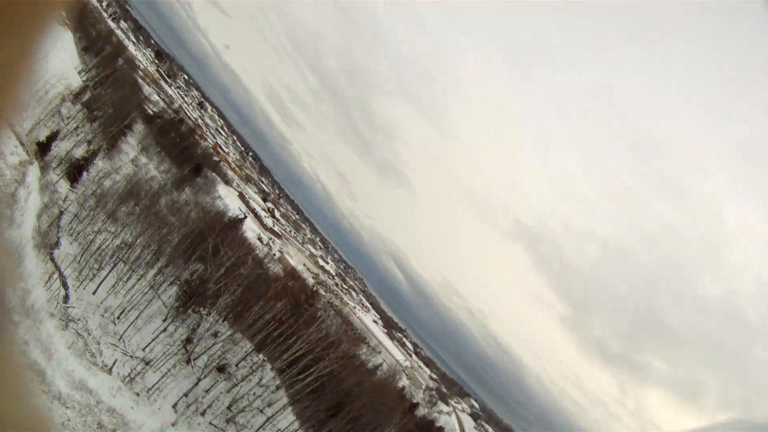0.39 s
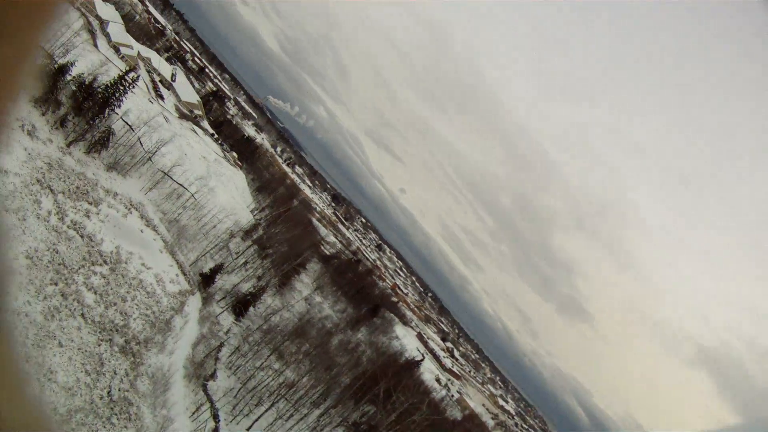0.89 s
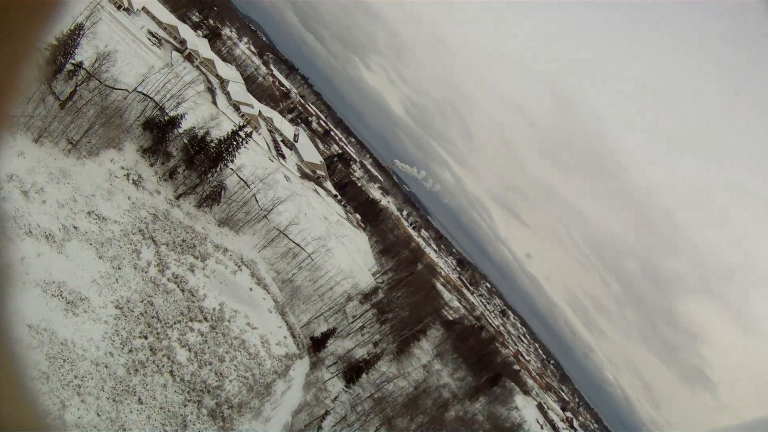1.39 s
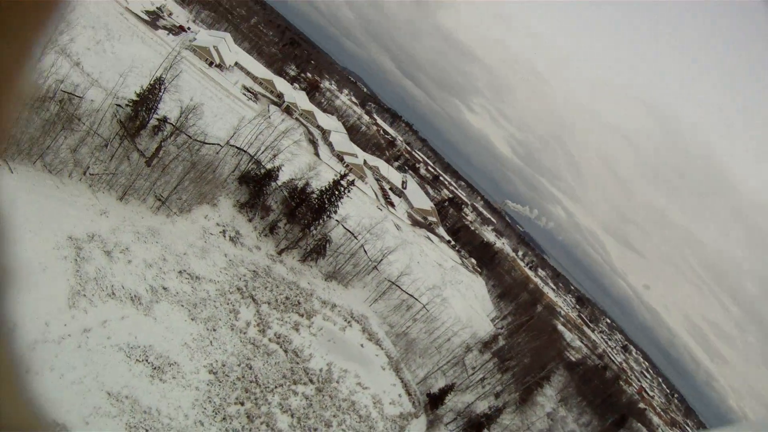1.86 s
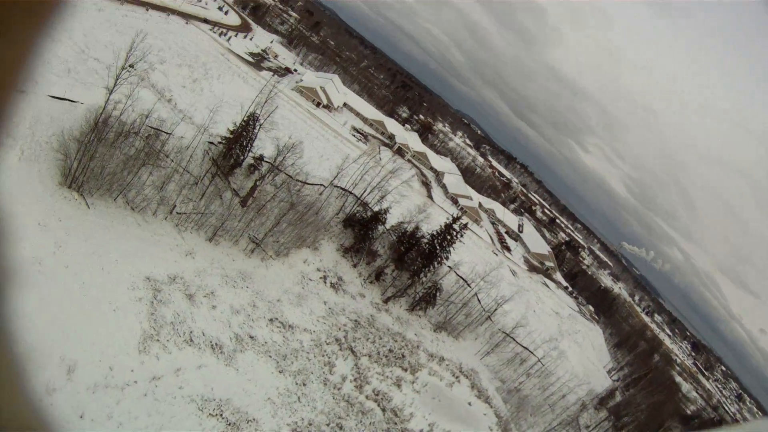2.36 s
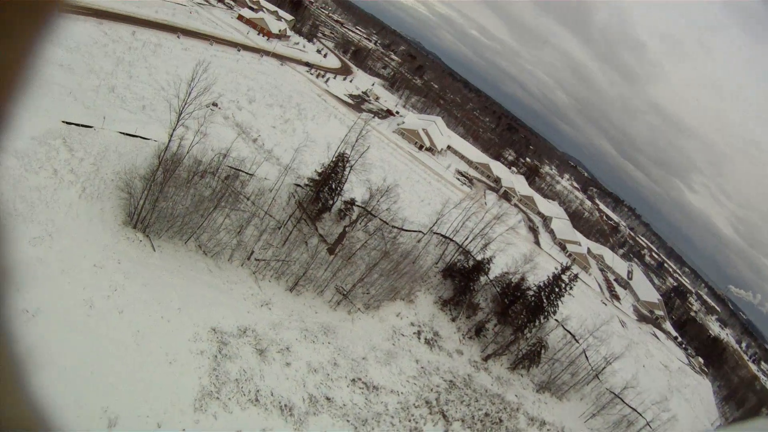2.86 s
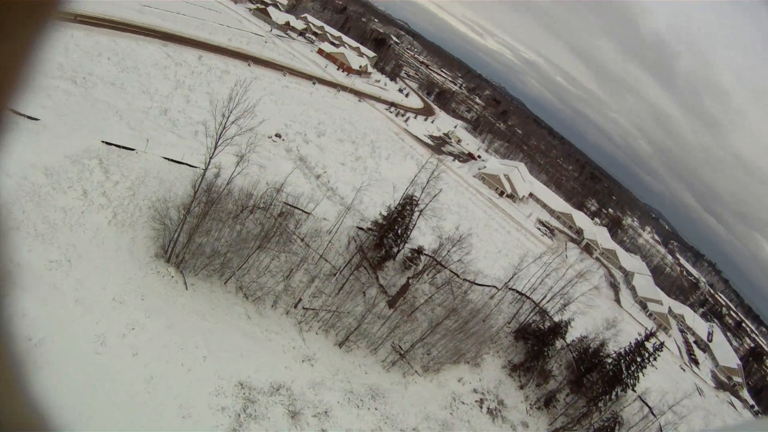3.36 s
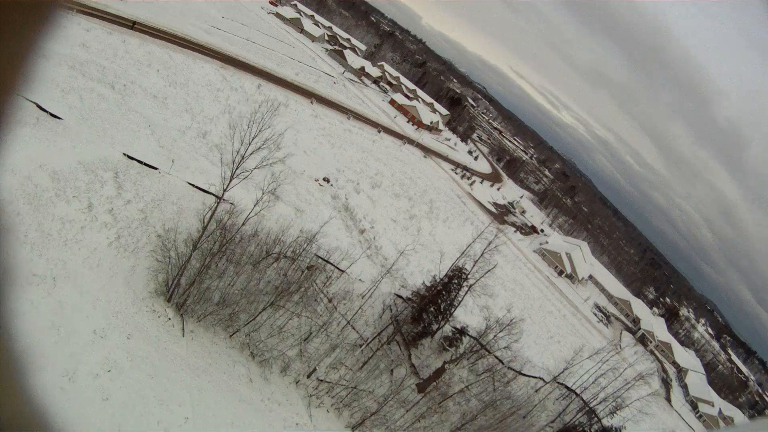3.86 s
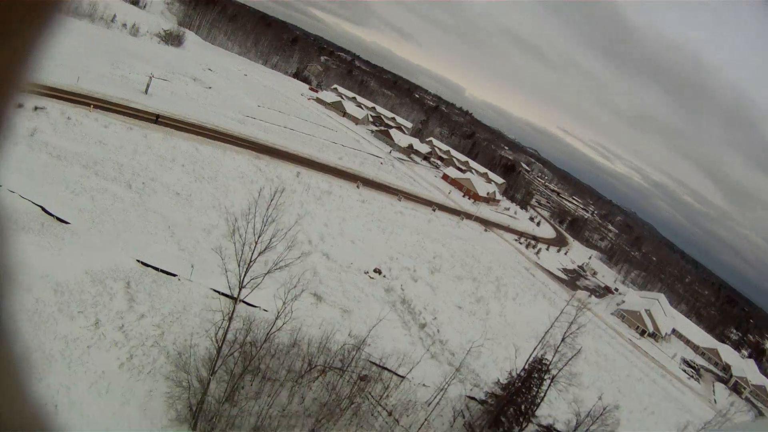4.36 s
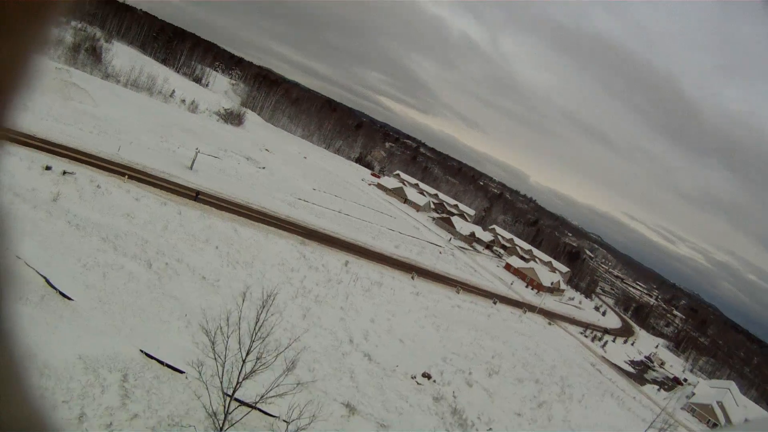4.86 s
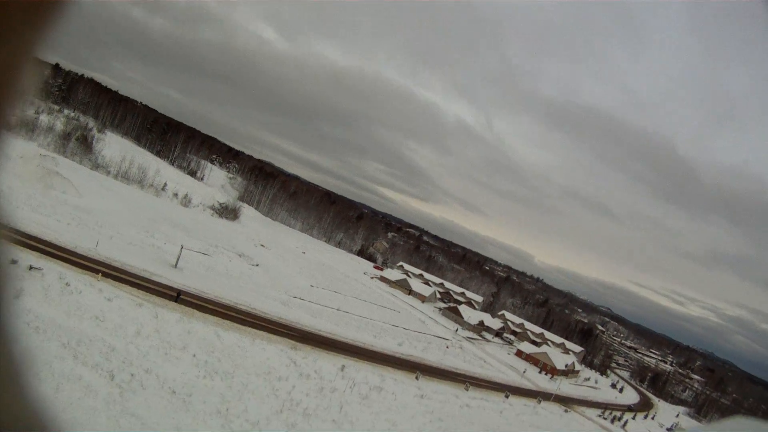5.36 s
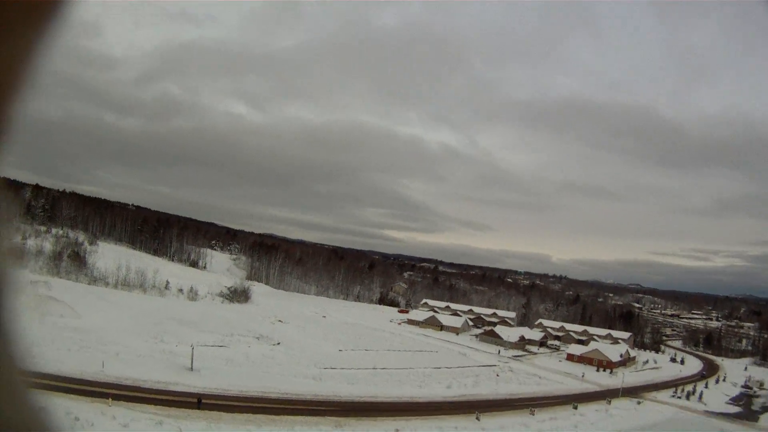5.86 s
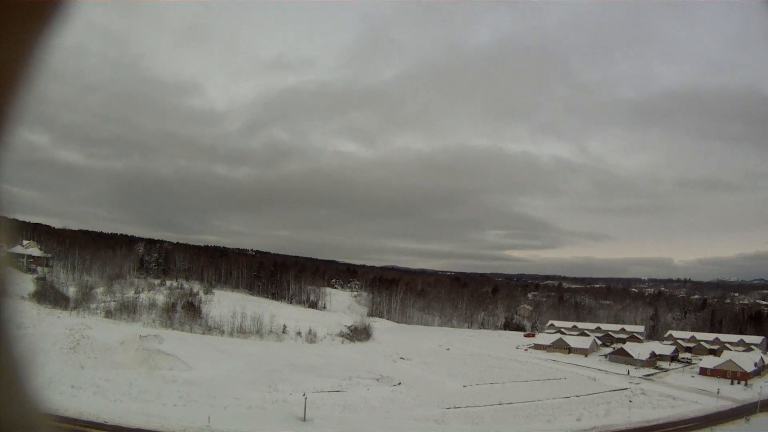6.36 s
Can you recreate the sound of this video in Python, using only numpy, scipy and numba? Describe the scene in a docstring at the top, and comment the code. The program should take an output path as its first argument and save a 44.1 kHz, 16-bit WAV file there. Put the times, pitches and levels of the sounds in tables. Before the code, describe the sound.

A cheap small microphone fixed to a flying airframe picks up twin propeller whine, dense and buzzy with a metallic, grainy treble. The two motors pulse against each other, slowly at first, faster from about three seconds. Pitch climbs a little, then eases down. Wind rumbles and thumps, strongest around five seconds, briefly ducking the sound. Dry servo ticks come at the start and the end.

```python
"""Two propellers of a twin-motor model plane whine at nearly the same speed and beat, through a banked turn.
A small camera rides on the airframe: airflow buffets and thumps its microphone, blade turbulence hisses,
and a servo twitches in its linkage. Tones are sums of sines, air is filtered noise, and the servo is
snaps and scrapes through resonances. Gain control ducks on loud peaks, and the camera's coarse sampling
holds each value, which mirrors every tone into the treble."""
import sys
import numpy as np
from scipy import signal
from scipy.fft import rfft, irfft
from scipy.io import wavfile
from scipy.ndimage import uniform_filter1d
from numba import njit

SR = 44100
rng = np.random.default_rng(int(sys.argv[2]) if len(sys.argv) > 2 else 0)


def unload_audio(sound):
    """Save the sound as a 16-bit wav file, at the path given as the first command line argument."""
    columns = np.transpose(np.atleast_2d(sound))
    # keep every value between -1 and 1, then stretch to whole-number steps
    steps = np.round(np.clip(columns, -1, 1) * 32767)
    wavfile.write(sys.argv[1], SR, steps.astype(np.int16))


def voltage_ratio(decibels):
    """Convert decibels (scalar or array-like) to amplitude ratios, 20 dB per decade."""
    exponent = np.asarray(decibels, float) / 20
    return 10 ** exponent


N = 286648
TIME = np.arange(N) / SR  # seconds
AIRFRAME_LAG = 0.25  # radians per order squared


def unit(x):
    """Scale to rms 1."""
    return x / np.sqrt(np.mean(x ** 2))


def colour(x, points):
    """Filter by a (Hz, dB) outline, interpolated over log frequency."""
    hz, db = np.transpose(points)
    f = np.maximum(np.fft.rfftfreq(len(x), 1 / SR), 1)
    gain = voltage_ratio(np.interp(np.log(f), np.log(hz), db, -90, -90))
    return irfft(rfft(x) * gain, len(x))


def walk(rate):
    """Random levels held 1 / rate seconds and slewed twice; spread near 1."""
    hold = int(SR / rate)
    steps = np.repeat(rng.standard_normal(N // hold + 1), hold)
    return 1.3 * uniform_filter1d(uniform_filter1d(steps, hold), hold)[:N]


def curves(table):
    """Columns of a table, after its seconds, as signals."""
    s, *columns = np.transpose(table)
    return [np.interp(TIME, s, c) for c in columns]


def tone(angle, db, flutter_db, throb=0., swell=1.):
    """A sine of given rms level that turbulent inflow makes flutter; some also throb evenly or swell."""
    beat = 2 * np.pi * 16.7 * TIME  # throb rate in Hz
    sway = 1 + throb * (np.cos(beat) + np.cos(2 * beat)) if throb else 1
    level = np.sqrt(2) * voltage_ratio(db + flutter_db * walk(60))
    return level * sway * np.abs(swell) * np.cos(angle + np.angle(swell))


# Near motor, low overtones. Each row: order of the blade rate, level in dB at 192 blade passes/s and
# zero loudness offset, slope in dB per blade pass/s above 192.
LOW_OVERTONES = [(2, -18, -0.28), (3, -17.5, 0.04), (4, -27.5, 0.29), (5, -24.5, .3), (6, -29, -0.42),
                 (7, -34, -.5), (8, -31, -0.36)]
# Higher overtones as the airframe passes them on. Each row: frequency in Hz, level in dB at zero
# loudness offset.
AIRFRAME = [(1700, -37.5), (1900, -34.5), (2100, -37.5), (2400, -42), (2700, -50), (3100, -52.5),
            (3400, -48), (3580, -38.5), (3800, -52), (4000, -43), (4200, -50), (4700, -67), (5150, -45),
            (5600, -50)]


def overtone_levels(speed, loudness_db):
    """Levels of orders 2 to 30: the low ones follow speed, the rest slide along the airframe's response."""
    reference_speed = 192  # blade passes per second
    low_per_loudness = 0.95  # dB per dB
    levels = [db + slope * (speed - reference_speed) + low_per_loudness * loudness_db
              for _, db, slope in LOW_OVERTONES]
    hz, db = np.transpose(AIRFRAME)
    for k in range(9, 31):
        levels.append(np.interp(k * speed, hz, db) + loudness_db + 2 * walk(3))
    return levels


# Both motors shake one frame, so overtones swell as the far blade gains on the near one.
# Each row: order, swells per turn gained (rounded when played), level in dB re the overtone,
# degrees ahead at the start.
SHARED_SHAKE = [(2, 1, -13, 39), (2, 2, -9.5, -5), (3, 2, -23, 44), (3, 2.5, -26.5, 63), (4, 1, -15, 90),
                (4, 1.5, -20, -65), (5, -1, -15.5, -162), (5, 1.5, -6, 14), (5, 2, -23.5, 59),
                (6, 1, 3, -165), (6, 2, -4, -110), (6, 3, -10, -49), (7, 1, 7, 59), (7, 2, -6.5, 184),
                (7, 3.5, -5, -125), (8, 0.5, -13.5, -135), (8, 2.5, -14.5, -50), (8, 2.5, -21, 1),
                (9, 1, -6, 62), (9, 2.5, -9, 180), (9, 3.5, -19, -10), (10, 1, -4.5, 51),
                (10, 1.5, -15, -21)]


def frame_swell(order, gained):
    """Complex gain of an overtone from the shared frame; higher overtones crest earlier."""
    lead_s = 0.013 * (order - 2)
    ahead = gained + np.gradient(gained) * SR * lead_s
    swell = 1
    for k, turns, db, degrees in SHARED_SHAKE:
        if k == order:
            swell = swell + voltage_ratio(db) * np.exp(1j * (round(turns) * ahead + np.radians(degrees)))
    return swell


def near_overtones(speed, angle, gained, loudness_db):
    """Overtones of the blade rate; the airframe delays lower ones, so each pass is a smeared pulse."""
    shaken = angle + 0.015 * walk(25)  # jitter in radians
    pulse_skew = 2.0  # radians, how lopsided the pressure pulse of a blade pass is
    total = np.zeros(N)
    for k, db in enumerate(overtone_levels(speed, loudness_db), start=2):
        phase = k * shaken + AIRFRAME_LAG * k * k + pulse_skew
        pole_throb = 0.3 if k == 7 else 0
        total += tone(phase, db, min(0.28 * k, 2.5), pole_throb, frame_swell(k, gained))
    return total


# Unequal blades sound once a shaft turn, between the overtones.
# Each row: order of the blade rate, level in dB before drift.
UNEQUAL_BLADES = [(2.5, -47), (3.5, -50.5), (4.5, -63), (6.5, -47.5), (7.5, -52)]


def unequal_blades(angle):
    """Half orders of the near propeller, whose blades differ; their levels drift."""
    return sum(tone(k * angle, db + 4 * walk(3.05), 2.2) for k, db in UNEQUAL_BLADES)


# Far motor; the high orders come from the magnets.
# Each row: order of the blade rate, level in dB before flutter.
FAR_ORDERS = [(1, -31), (7, -37.5), (13, -38.5), (14, -45), (28, -50)]


def far_motor(angle):
    """A few orders, and the speed controller's switching tone lowered by a magnet order."""
    orders = sum(tone(k * angle - AIRFRAME_LAG * k * k, db, 2.9) for k, db in FAR_ORDERS)
    switching = 2 * np.pi * 8016 * TIME - 14 * angle  # 8016 Hz less order 14
    return orders + tone(switching, -32, 0.8, throb=0.18)


# Outline of the blade hiss before rms scaling. Each row: frequency in Hz, relative density in dB per Hz.
RUSH = [(150, -18), (300, -19.5), (480, -4), (680, -6), (860, -3.5), (1300, -2.5), (1900, -5), (2500, -8.5),
        (3000, -15.5), (3600, -13.5), (4500, -13.5), (5200, -12), (5700, -17), (5950, -21.5)]


def rush(angle, db):
    """Blade turbulence: hiss that swells at each blade pass, with scattered ticks."""
    ticks = voltage_ratio(1.5 * rng.exponential(size=N)) * rng.standard_normal(N)
    gate = 1 + 0.28 * np.cos(angle) + 0.24 * np.cos(3 * angle)
    unsteady = voltage_ratio(0.68 * walk(30) + 0.43 * walk(6.5))
    return unit(colour(gate * ticks * unsteady, RUSH)) * voltage_ratio(db)


# Outline of the wind on the microphone before rms scaling and limiting.
# Each row: frequency in Hz, relative density in dB per Hz.
BUFFET = [(12, -36), (20, -6), (43, -2.5), (86, -2), (167, -7.5), (195, -8.5), (222, -12.5), (340, -17),
          (440, -20), (750, -120)]


def buffet(db):
    """Eddies shed over the microphone port: low noise in uneven bursts of limited swing."""
    bursts = rng.standard_normal(N) * voltage_ratio(2.7 * walk(25))
    eddies = unit(colour(bursts, BUFFET))
    return 3.84 * np.tanh(eddies / 2.0) * voltage_ratio(db)


# Servo knocks at set times, strong and weak. Each row: start in seconds, strength in dB before the
# linkage rings.
KNOCKS = [(0.0133, -13.5), (0.0378, -20), (0.076, -7.5), (0.2124, -23), (0.2754, -17), (0.3905, -16.5),
          (0.429, -13), (0.508, -22), (0.7834, -23), (0.824, -16), (0.9227, -15), (1.1573, -18),
          (5.4294, -10), (5.5283, -14.5), (5.5424, -15), (5.566, -16), (5.585, -18), (5.665, -21),
          (5.6827, -19), (5.8052, -19.5), (5.842, -20), (6.0378, -18), (6.1204, -10), (6.1327, -14),
          (6.1428, -5), (6.147, -3), (6.1574, -12), (6.167, -9), (6.1764, -15.5)]
# The servo hunts. Each row: start in seconds, end in seconds, typical twitch strength in dB
# before the linkage rings.
HUNTS = [(0.03, 0.52, -24), (0.77, 1.11, -24.5), (5.36, 5.86, -22.5), (6.04, 6.23, -24)]


def twitches():
    """Set knocks, and chance twitches on the command pulses while the servo hunts."""
    pulses = np.arange(0.0156, N / SR, 0.019687)  # first pulse and spacing in seconds
    luck, size = rng.random(len(pulses)), rng.standard_normal(len(pulses))
    share, spread_db, hardest_db = 0.65, 3, -15  # of the chance twitches
    events = list(KNOCKS)
    for start, end, db in HUNTS:
        for s, u, z in zip(pulses, luck, size):
            if start < s < end and u < share:
                events.append((s, min(db + spread_db * z, hardest_db)))
    return events


# Resonances of the linkage. Each row: frequency in Hz, width in Hz, relative level in dB.
LINKAGE = [(2360, 2160, -3), (4080, 620, -1), (4537, 190, -1)]


def rattle():
    """Each twitch snaps and scrapes, longer when harder, with stray gear ticks near; all ring the linkage."""
    scrape, snap = np.zeros(N), np.zeros(N)
    age = np.arange(SR // 20) / SR
    for s, db in twitches():
        i = int(s * SR)
        fall_s = max(0.038 + 0.0011 * db, 0.003)  # time to fall 60 dB
        scrape[i:i + len(age)] += voltage_ratio(db - 60 * age / fall_s)
        snap[int((s + 0.0005) * SR)] = 3 * voltage_ratio(db)
    busy = uniform_filter1d(np.minimum(scrape, 0.05), SR // 12)
    strikes = rng.random(N) < 180 / SR  # 180 chances a second
    ticks = 45 * busy * strikes * rng.standard_normal(N)
    dry_rattle = snap + ticks + scrape * rng.standard_normal(N)
    rung = np.zeros(N)
    for hz, width, db in LINKAGE:
        rung += voltage_ratio(db) * signal.lfilter(*signal.iirpeak(hz, hz / width, SR), dry_rattle)
    return 2.25 * rung


# Gust thumps on the microphone. Each row: time of the push in seconds, relative level in dB,
# pulse rate in Hz.
THUMPS = [(0.566, -6, 90), (1.116, 2, 116), (1.314, 3, 110), (1.487, 1, 129), (1.992, -4.5, 97),
          (3.056, 1.5, 91), (3.094, 2, 90), (3.148, 1, 90), (3.186, 2.5, 90), (3.425, 1.5, 121),
          (3.448, 8.5, 93), (3.751, 3.5, 91), (4.113, 5, 92), (4.37, -4, 91), (4.426, 2, 91.5),
          (4.637, -8, 89), (4.751, 1.5, 92), (4.817, 2.5, 88), (4.971, 3.5, 90), (5.002, -4, 90),
          (5.023, 10, 109), (5.166, 1, 88), (5.322, -0.5, 90), (5.36, 2.5, 92), (5.514, 3, 104),
          (5.847, 4, 103), (6.357, 5, 88), (6.401, 3, 90)]


def thumps():
    """Each strong eddy sucks, then pushes the diaphragm."""
    out = np.zeros(N)
    for s, db, hz in THUMPS:
        near = slice(int((s - 0.02) * SR), int((s + 0.02) * SR))
        u = 2 * np.pi * hz * (TIME[near] - s) + 1
        out[near] += 0.74 * voltage_ratio(db) * (u + 0.54) * np.exp(-u * u / 2)
    return out


# Propeller speeds. Each row: time in seconds, near and far propeller blade passes per second.
SPEED = [(0.0, 190.482, 190.851), (1.2, 190.469, 190.864), (2.0, 190.471, 190.879),
         (2.62, 190.433, 190.817), (2.9, 190.508, 192.156), (3.2, 190.478, 193.406),
         (3.4, 190.418, 193.596), (3.65, 190.526, 194.062), (3.8, 190.177, 194.907),
         (3.95, 194.541, 194.82), (4.1, 196.223, 195.634), (4.55, 198.825, 197.218),
         (4.85, 199.946, 197.088), (5.15, 199.482, 196.967), (5.45, 196.49, 194.96),
         (5.75, 193.943, 193.625), (6.0, 193.219, 193.361), (6.5, 191.958, 192.248)]
# Air and overtones over time. Each row: time in seconds, relative buffeting of the microphone in dB,
# overtone loudness in dB.
AIR = [(0.0, -24, -4), (0.3, -26.5, -0.5), (0.75, -25, 0.8), (1.05, -28, -0.3), (1.25, -26, -2),
       (1.5, -28.5, -1.7), (2.0, -27, -2), (2.66, -26, -1.8), (2.95, -23, -1), (3.39, -22.5, -1.5),
       (3.67, -20, -1.5), (3.9, -21.5, -.3), (4.42, -19, -2), (4.82, -21.5, -3), (4.96, -13, -2.5),
       (5.17, -19.5, -6.5), (5.35, -21, -1.5), (6.1, -22.5, -1.9), (6.37, -22, 1.5), (6.5, -27, 0)]


def scene():
    """Motors, air and rattle add up at the microphone, driven by speed, buffeting and loudness curves."""
    near, far = curves(SPEED)
    angle = 2 * np.pi * np.cumsum(near) / SR
    far_angle = 2 * np.pi * np.cumsum(far) / SR
    buffet_db, loudness_db = curves(AIR)
    motors = near_overtones(near, angle, far_angle - angle, loudness_db) + unequal_blades(angle)
    motors += far_motor(far_angle + 0.31)  # far blade angle at the start, radians
    rush_db = -25 + 0.17 * loudness_db
    air = rush(angle, rush_db) + buffet(buffet_db) + thumps()
    return (motors + air + rattle())[None]


@njit
def follow(x, top, attack, release):
    """Peak follower that never sinks under top: quick up, slow down."""
    level, out = top, np.empty(len(x))
    for i in range(len(x)):
        peak = max(abs(x[i]), top)
        level += (peak - level) * (attack if peak > level else release)
        out[i] = level
    return out


def low_pass(x):
    """Removes everything above the highest recorded frequency."""
    return signal.sosfilt(signal.butter(12, 15350, fs=SR, output="sos"), x)


def record(dry):
    """The camera: gain control, soft overload, bass cut, and 12 kHz sampling with each value held."""
    top, attack_s, release_s = 0.56, 0.0017, 0.09
    gain = (top / follow(dry[0], top, 1 / (attack_s * SR), 1 / (release_s * SR))) ** 1.57
    overloaded = np.tanh(1.113 * dry[0] * gain) / 0.98
    bass_cut = signal.butter(2, 35., "high", fs=SR, output="sos")
    coarse = signal.resample_poly(signal.sosfilt(bass_cut, overloaded), 40, 147)  # to 12 kHz
    held = signal.resample_poly(np.repeat(coarse, 4), 147, 160)[:N]  # 48 kHz steps back to SR
    mix = np.pad(held, (0, N - len(held)))[None]
    return low_pass(mix)


dry = scene()
out = record(dry)
unload_audio(out)
```